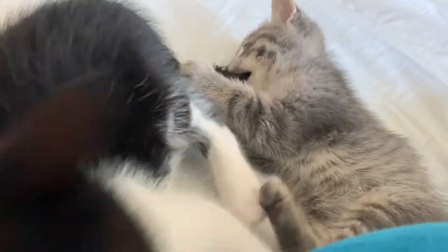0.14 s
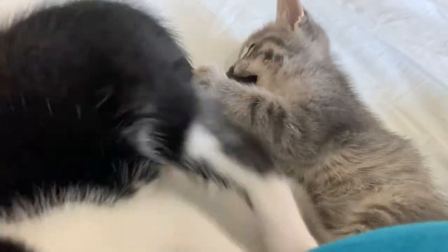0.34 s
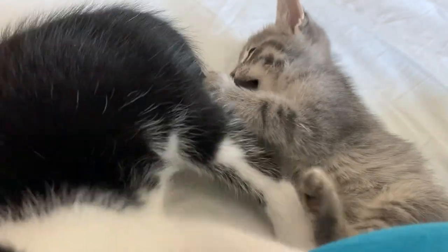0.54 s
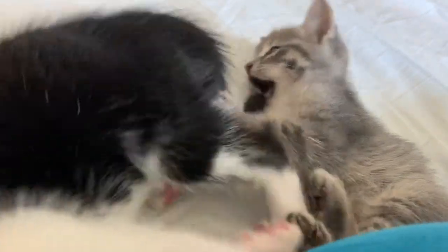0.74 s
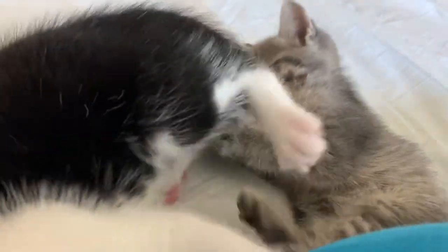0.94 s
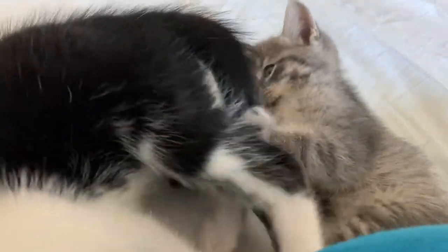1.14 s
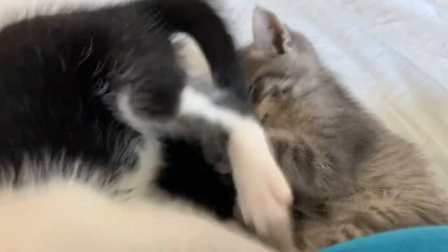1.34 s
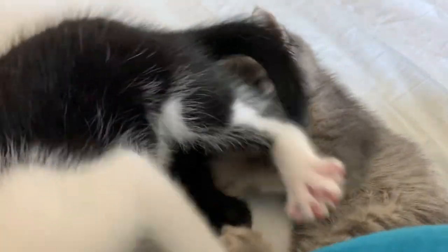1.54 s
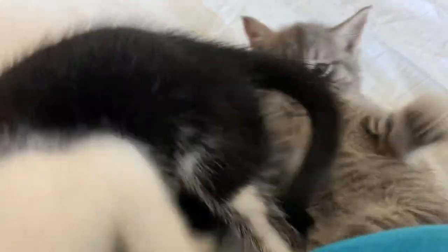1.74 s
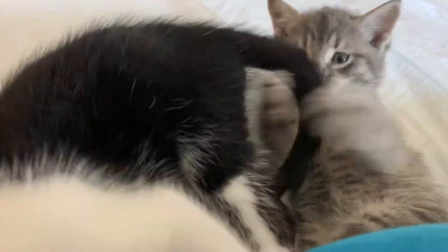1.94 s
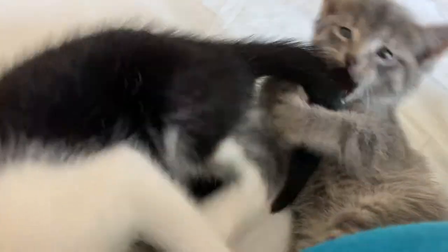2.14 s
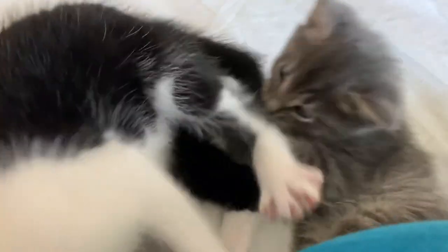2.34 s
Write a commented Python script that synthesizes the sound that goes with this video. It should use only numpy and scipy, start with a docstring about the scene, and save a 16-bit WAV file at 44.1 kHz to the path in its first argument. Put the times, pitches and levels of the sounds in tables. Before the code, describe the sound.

Kittens wrestling on a bed, with soft thumps and rustling of bedding and fur.

```python
"""Kittens wrestling on a bed

Two kittens, right beside a stereo microphone in a quiet room. Paws land on the bedding: each blow
spreads as a wave whose highs arrive first, a short falling pat and a deep falling thump.
Legs and bodies drag over the sheet in stick-slip strokes with a hiss of fur, claws zip and tick
in the weave, and the mattress keeps stirring. Near the end the taut sheet creaks."""
import sys
import numpy as np
from scipy import signal
from scipy.fft import rfft, irfft
from scipy.io import wavfile
from scipy.ndimage import uniform_filter1d

SR = 44100
rng = np.random.default_rng(int(sys.argv[2]) if len(sys.argv) > 2 else 0)


def pcm_store(signal):
    """Save signal as 16-bit PCM."""
    levels = np.round(np.clip(np.atleast_2d(signal), -1, 1) * 32767)
    wavfile.write(sys.argv[1], SR, levels.astype(np.int16).T)


N = 109764
T = np.arange(N) / SR

# the mattress stirring under the kittens: (time [s], level [dB])
STIR_LEVELS = [(0, -53), (.6, -53), (1.0, -49), (1.15, -41.5), (1.55, -51.5), (1.9, -39.5), (2.2, -50),
               (2.49, -35.5)]
# spectra of the mattress and of the room's air: (frequency [Hz], relative level [dB])
MATTRESS_SPECTRUM = [(12, -20), (25, 3), (55, -1.5), (90, -5), (140, -12), (250, -29), (500, -33),
                     (1500, -69.5)]
AIR_SPECTRUM = [(100, 0), (300, -1), (700, -12), (1200, -9), (2000, -8.5), (4000, -16), (6500, -14.5),
                (9000, -15.5), (14800, -17), (16000, -13)]
# strokes over the sheet: (peak time [s], rise [s], fall [s], drag [dB], scrape [dB], swish [dB], fur [dB])
SHEET_STROKES = [(0.005, 0.09, 0.21, -60, -62.5, -82, -77), (0.255, 0.2, 0.19, -71, -62.5, -68, -72.5),
                 (0.432, 0.024, 0.049, -51.5, -58, -69.5, -79), (0.590, 0.25, 0.16, -66, -68.5, -86, -94),
                 (0.693, 0.036, 0.032, -50.5, -49.5, -66, -73), (0.725, 0.16, 0.15, -59, -60.5, -70, -74),
                 (0.876, 0.028, 0.054, -47, -51, -63.5, -65), (1.072, 0.051, 0.061, -56, -57, -65, -66),
                 (1.13, 0.063, 0.1, -42.5, -51, -59.5, -58), (1.208, 0.13, 0.12, -56.5, -54, -65.5, -64.5),
                 (1.334, 0.047, 0.07, -40, -46.5, -58, -62.5), (1.359, 0.026, 0.042, -48, -49, -56.5, -62),
                 (1.425, 0.17, 0.3, -57, -56, -67.5, -74), (1.648, 0.1, 0.1, -67, -57, -66.5, -70),
                 (1.845, 0.082, 0.081, -70, -50.5, -57, -58), (1.866, 0.033, 0.074, -43.5, -48, -61, -59),
                 (1.926, 0.085, 0.033, -40.5, -45, -59, -82), (1.985, 0.062, .03, -44.5, -40, -59, -66.5),
                 (2.039, 0.15, 0.33, -59.5, -58, -67, -70.5),
                 (2.173, 0.092, 0.13, -44.5, -47.5, -58.5, -67.5),
                 (2.245, 0.067, 0.072, -39, -38, -54.5, -71), (2.304, 0.035, 0.076, -43, -49, -60.5, -65),
                 (2.344, 0.014, 0.034, -32.5, -35.5, -45.5, -55),
                 (2.376, 0.028, 0.13, -46.5, -50, -62, -65.5)]
# spectra of low drag, scrape, cloth swish and fur hiss: (frequency [Hz], relative level [dB])
DRAG_SPECTRUM = [(100, -58), (180, -2), (310, -5.5), (430, -9.5), (560, -10), (720, -25), (1100, -76),
                 (2000, -95)]
SCRAPE_SPECTRUM = [(350, -7.5), (600, 1), (800, 0), (1050, -7), (1350, -10), (1650, -18), (1950, -35),
                   (3000, -77)]
SWISH_SPECTRUM = [(1200, -8), (2000, -3.5), (2700, -2.5), (3400, -1), (4400, -6.5), (5600, -6.5),
                  (7300, -12), (9500, -29.5), (16000, -41)]
FUR_SPECTRUM = [(3000, -36), (5500, -3.5), (7300, -2), (9000, 1), (14800, -10.5), (15800, -22)]
# claws sliding over the weave: (peak time [s], half length [s], level [dB], pitch [Hz], bandwidth [Hz])
CLAW_ZIPS = [(0.008, .022, -61, 740, 200), (0.258, .04, -63, 1050, 400), (0.308, 0.054, -71.5, 3400, 594),
             (1.208, 0.062, -50, 720, 380)]
# weight landing on the mattress: (time [s], level [dB], first pitch [Hz], last pitch [Hz], swell [s])
MATTRESS_THUMPS = [(0.069, -45, 139, 50.4, 0.007), (0.171, -35.5, 45, 42.8, .022),
                   (0.228, -39, 57, 38, 0.012), (0.427, -32.5, 120, 117, .012),
                   (0.444, -32, 50, 35.1, 0.019), (0.692, -36, 247, 146, 0.0036),
                   (0.706, -39.5, 61, 37, .018), (0.87, -22.5, 103, 36.5, 0.0069),
                   (0.890, -27, 49.6, 32, 0.013), (1.061, -33.5, 119, 65, 0.0077),
                   (1.118, -32.5, 81, 45, 0.011), (1.179, -35.5, 68, 44.4, 0.011),
                   (1.252, -53, 55, 40.2, 0.025), (1.329, -29.5, 164, 59, 0.0083),
                   (1.361, -27.5, 60, 44.5, 0.021), (1.660, -38, 42, 33.7, .016),
                   (1.709, -32, 90, 57.6, 0.012), (1.756, -41, 65, 50, 0.023), (1.816, -29, 50, 32, 0.016),
                   (1.86, -29.5, 62, 38, 0.0071), (1.933, -18.5, 80.4, 44.6, 0.0066),
                   (1.985, -29.5, 199, 130, 0.0077), (2.036, -39, 190, 45, .012),
                   (2.085, -30.5, 100, 65.5, 0.0072), (2.290, -42, 45, 35, 0.018),
                   (2.355, -24, 114, 42, 0.0069), (2.38, -23.5, 68.6, 53.7, 0.015),
                   (2.443, -24.5, 70.5, 37.4, 0.0063)]
# paws patting the sheet: (time [s], level [dB], pitch at the peak [Hz], swell [s])
PAW_PATS = [(0.0703, -53, 716, .0012), (0.271, -48.5, 896, 0.0019), (0.4268, -39.5, 740, 0.00092),
            (0.6907, -35, 520, 0.0015), (0.864, -37, 362, 0.002), (0.8701, -35, 724, 0.0016),
            (1.060, -39, 850, .0013), (1.073, -38, 330, 0.0024), (1.128, -32.5, 432, 0.0017),
            (1.3087, -29, 640, 0.0017), (1.3285, -24, 620, .0015), (1.3638, -36, 850, .0013),
            (1.424, -45.5, 877, 0.0026), (1.717, -44, 324, .002), (1.927, -34.5, 570, 0.0017),
            (1.9707, -24.5, 745, 0.00162), (1.985, -30.5, 574, 0.0028), (2.039, -43.5, 398, 0.0032),
            (2.342, -28, 504, 0.00353), (2.371, -28.5, 610, 0.001)]
# claws catching threads: (time [s], level [dB], pitch [Hz], half bandwidth [octaves])
CLAW_TICKS = [(0.3065, -47.5, 10130, 0.066), (0.3087, -48, 12800, 0.18), (0.407, -51.5, 6500, 0.47),
              (0.4684, -46.5, 7800, 0.3), (0.827, -53.5, 13700, .1), (1.017, -58, 5500, .6),
              (1.0598, -43, 3600, 1), (1.1305, -41, 3000, 1.2), (1.197, -49, 5000, 0.96),
              (1.4118, -48.5, 2800, 1), (1.927, -46, 3650, 0.42), (1.984, -60, 4000, 1.1)]
# the taut sheet under a paw: (peak time [s], half length [s], level [dB], pitch [Hz], glide [octaves/s])
SHEET_CREAKS = [(2.234, .019, -34.5, 309.5, -2.5), (2.261, .017, -37.5, 435, -5),
                (2.302, .011, -37, 519, -2.5), (2.309, .011, -40.5, 313, -4)]

TREBLE_LAG_S, THUMP_LAG_S = 0.000223, 0.00027   # later arrival at the microphone's left side
SCRAPE_LEFT_DB = 4


def from_db(db):
    """Decibels to gain."""
    return 10 ** (np.asarray(db) / 20)


def unit_rms(x):
    """Scale to an rms of 1."""
    return x / np.sqrt(np.mean(x ** 2) + 1e-20)


def colour(x, spectrum):
    """Give x a spectrum drawn on a log-frequency axis; rms 1."""
    hz, db = np.transpose(spectrum)
    bin_hz = np.maximum(np.arange(N // 2 + 1) * SR / N, 1)
    gain = from_db(np.interp(np.log(bin_hz), np.log(hz), db))
    return unit_rms(irfft(rfft(x) * gain, N))


def band(x, low_hz, high_hz):
    """Band-pass."""
    edges_hz = [max(low_hz, 20), min(high_hz, .45 * SR)]
    return signal.sosfilt(signal.butter(2, edges_hz, "band", fs=SR, output="sos"), x + 1e-18)


def pan(x, left_db):
    """Make the left channel left_db louder than the right."""
    return x * from_db(np.array([[1], [-1]]) * left_db / 2)


def widen(pair, side_db):
    """Two unrelated signals as mid and side of a stereo sound; rms 1."""
    return unit_rms(pair[0] + from_db(side_db) * pair[1] * np.array([[1], [-1]]))


def lag_left(left, right, lag_s):
    """Delay the left channel."""
    return np.array([np.interp(T - lag_s, T, left), right])


def friction(spectrum, per_s, spread_db, side_db):
    """Random tiny slips of uneven size, coloured and spread in stereo; rms 1."""
    sizes = from_db(spread_db * np.minimum(rng.exponential(1, (2, N)), 4))
    slips = (rng.random((2, N)) < per_s / SR) * sizes * rng.choice([-1, 1], (2, N))
    return widen(colour(slips, spectrum), side_db)


def wave(hz, age):
    """A gliding wave that swells until age 1 and dies away."""
    return np.sin(2 * np.pi * np.cumsum(hz * (age > 0)) / SR) * (age * np.exp(1 - age)) ** 2


def mattress_stir():
    """The mattress rumbles under the moving kittens."""
    rumble = widen(colour(rng.standard_normal((2, N)), MATTRESS_SPECTRUM), side_db=-14.5)
    return from_db(np.interp(T, *np.transpose(STIR_LEVELS))) * rumble


def room_air():
    """Faint, steady room tone behind the bed."""
    air = from_db(-66) * widen(colour(rng.standard_normal((2, N)), AIR_SPECTRUM), side_db=-6.5)
    return lag_left(*air, TREBLE_LAG_S)


def sheet_strokes():
    """Legs and bodies drag past the microphone, sticking and slipping in the bedding and the fur."""
    power = np.zeros((4, N))
    for s, rise, fall, *levels_db in SHEET_STROKES:
        # 20 dB down one rise before and one fall after the peak
        shape_db = -20 * np.maximum((s - T) / rise, (T - s) / fall)
        power += from_db(np.array(levels_db)[:, None] + np.maximum(shape_db, -200)) ** 2
    drag, scrape, swish, fur = np.sqrt(power)
    drag = drag * friction(DRAG_SPECTRUM, per_s=1800, spread_db=2.5, side_db=-31)
    scrape = scrape * friction(SCRAPE_SPECTRUM, per_s=1800, spread_db=2.5, side_db=-8)
    swish = swish * friction(SWISH_SPECTRUM, per_s=9000, spread_db=4, side_db=-2.5)
    fur = fur * friction(FUR_SPECTRUM, per_s=9000, spread_db=4, side_db=-21.5)
    treble = pan(swish, left_db=10.5) + pan(fur, left_db=1.5)
    return pan(drag, left_db=-2) + pan(scrape, SCRAPE_LEFT_DB) + lag_left(*treble, TREBLE_LAG_S)


def claw_zips():
    """Threads pass under a sliding claw at a nearly even rate: a faint, narrow band of noise."""
    out = np.zeros(N)
    for s, half, db, hz, width in CLAW_ZIPS:
        threads = unit_rms(band(rng.standard_normal(N), hz - width / 2, hz + width / 2))
        out += from_db(db) * np.exp(-((T - s) / half) ** 2) * threads
    return pan(out, SCRAPE_LEFT_DB)


def mattress_thumps(settle_s=0.016):
    """The mattress takes a kitten's weight and wobbles at a sinking pitch."""
    out = np.zeros(N)
    for s, db, first_hz, last_hz, swell in MATTRESS_THUMPS:
        t = np.maximum(T - s, 0)
        pitch = last_hz + (first_hz - last_hz) * np.exp(-t / settle_s)
        out += from_db(db) * wave(pitch, t / swell)
    return lag_left(out, out, THUMP_LAG_S)


def paw_pats(fall_octaves=1.69, muffle_hz=1900):
    """A paw's blow runs through the sheet, highs first: a brief chirp, its top muffled by the cloth."""
    out = np.zeros(N)
    for s, db, hz, swell in PAW_PATS:
        age = np.maximum(T - s, 0) / swell
        pitch = hz * 2 ** (-fall_octaves * (age - 1) / 2)   # drops fall_octaves every two swells
        out += from_db(db) * wave(pitch, age)
    cloth = signal.butter(6, muffle_hz, fs=SR, output="sos")
    return pan(signal.sosfiltfilt(cloth, out + 1e-18), left_db=1.5)


def claw_ticks(decay_s=.0007):
    """A thread snaps off a claw with a tiny bright tick, left of centre."""
    out = np.zeros(N)
    for s, db, hz, octaves in CLAW_TICKS:
        burst = rng.standard_normal(N) * (T >= s) * np.exp(-np.abs(T - s) / decay_s)
        tick = band(burst, hz / 2 ** octaves, hz * 2 ** octaves)
        out += from_db(db) * tick / np.abs(tick).max()
    return pan(out, left_db=6.5)


def sheet_creaks(jitter_depth=0.0598, jitter_s=0.00375):
    """Under a sliding paw the slips fall into step for a few cycles: a short, unsteady, sinking tone."""
    out = np.zeros(N)
    for s, half, db, hz, glide in SHEET_CREAKS:
        jitter = unit_rms(uniform_filter1d(rng.standard_normal(N), int(jitter_s * SR)))
        octaves = glide * np.clip(T - s, -2 * half, 2 * half)
        pitch = hz * 2 ** octaves * (1 + jitter_depth * jitter)
        envelope = from_db(db) * np.exp(-((T - s) / half) ** 2)
        out += envelope * np.sin(2 * np.pi * np.cumsum(pitch) / SR)
    return out


def scene():
    """Everything on the bed, close and dry, over the room tone."""
    blows = mattress_thumps() + paw_pats()
    rubbing = sheet_strokes() + sheet_creaks()
    claws = claw_zips() + claw_ticks()
    return blows + rubbing + claws + mattress_stir() + room_air()


def record(dry):
    """The microphone's top end is cut steeply, 60 dB down at 16473 Hz."""
    return signal.sosfilt(signal.cheby2(16, 60, 16473, fs=SR, output="sos"), dry)


dry = scene()
out = record(dry)
pcm_store(out)
```